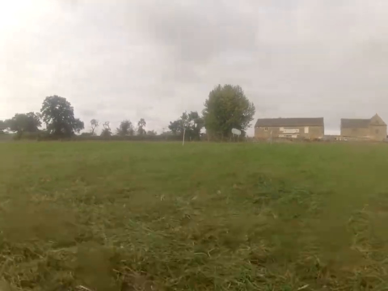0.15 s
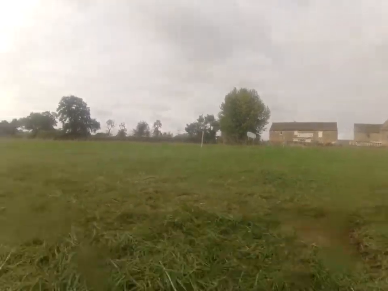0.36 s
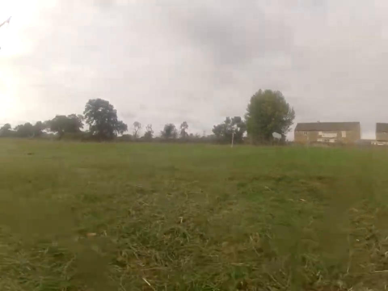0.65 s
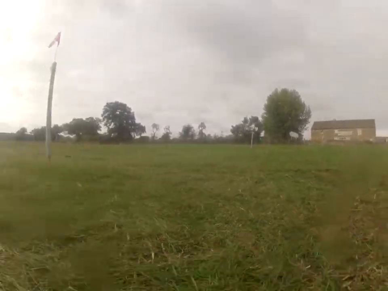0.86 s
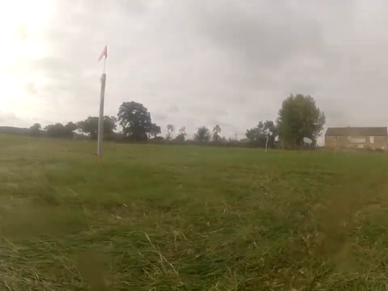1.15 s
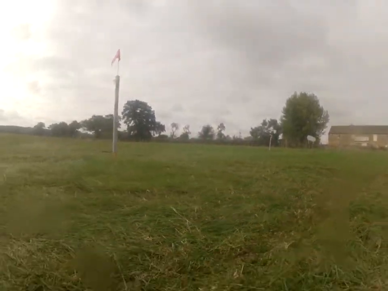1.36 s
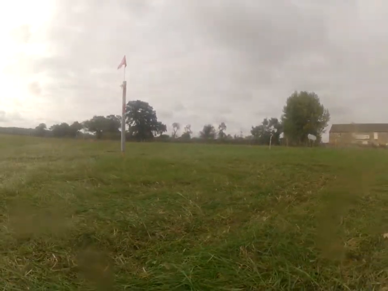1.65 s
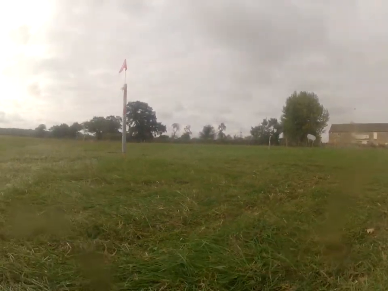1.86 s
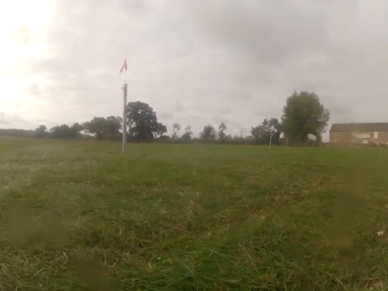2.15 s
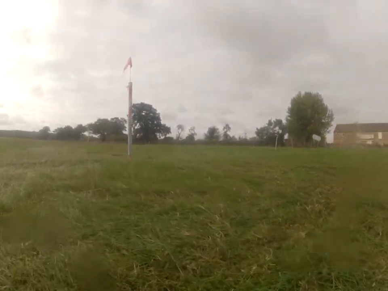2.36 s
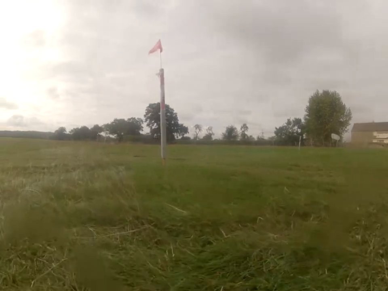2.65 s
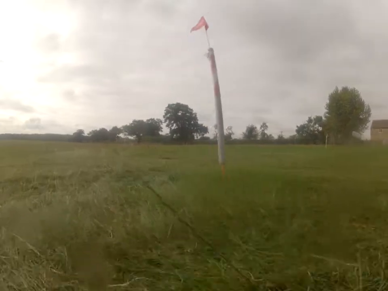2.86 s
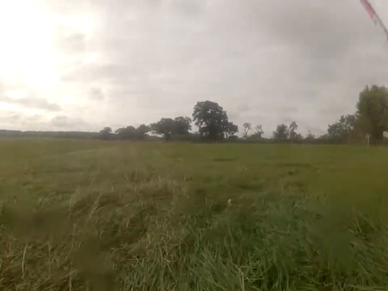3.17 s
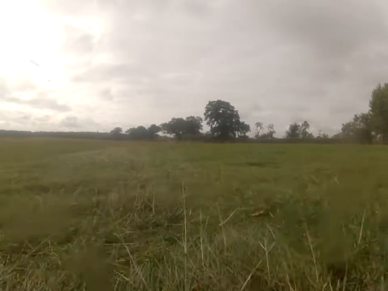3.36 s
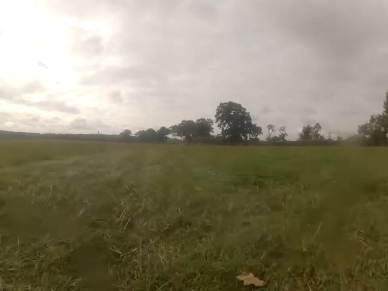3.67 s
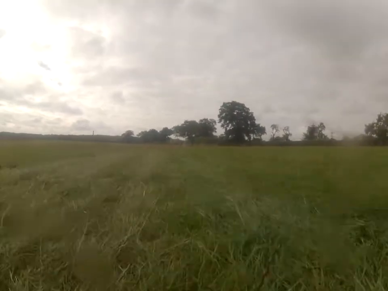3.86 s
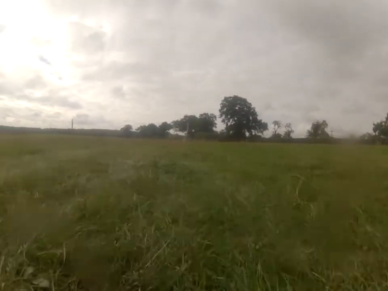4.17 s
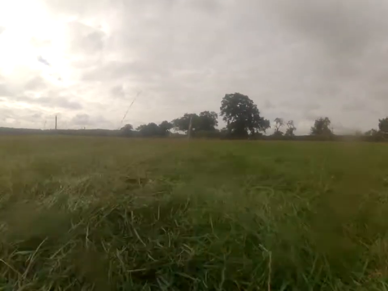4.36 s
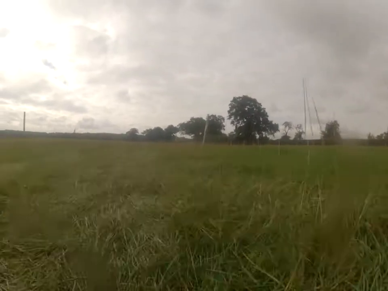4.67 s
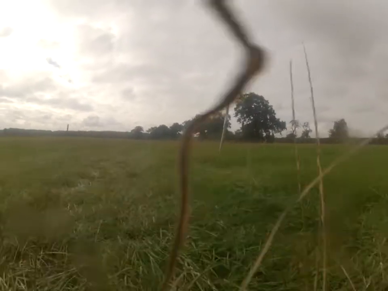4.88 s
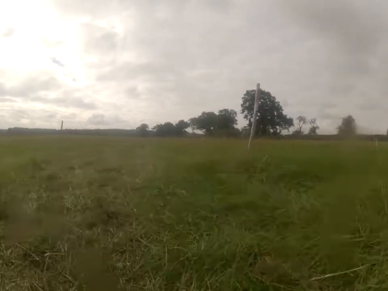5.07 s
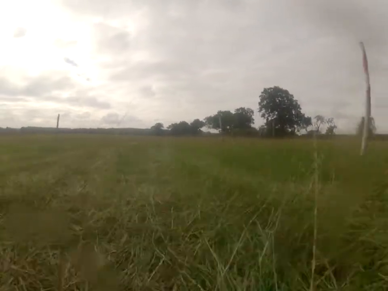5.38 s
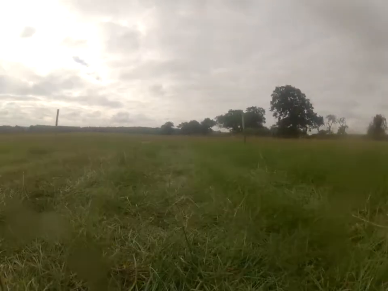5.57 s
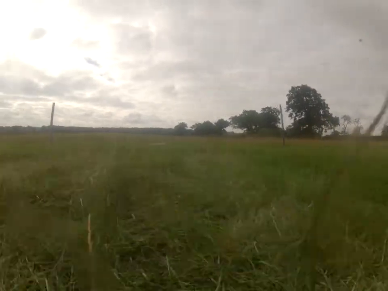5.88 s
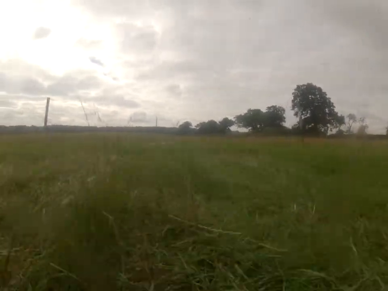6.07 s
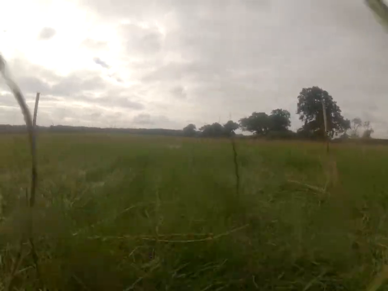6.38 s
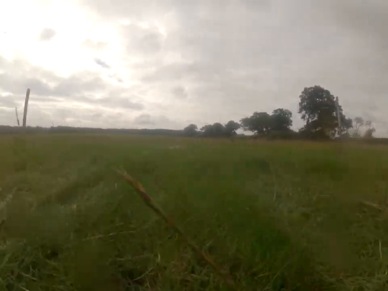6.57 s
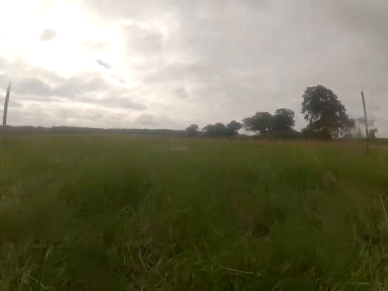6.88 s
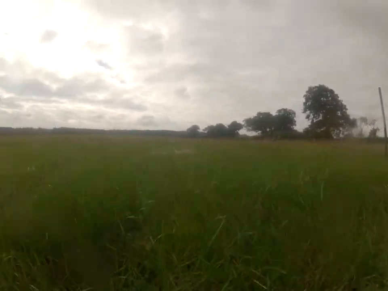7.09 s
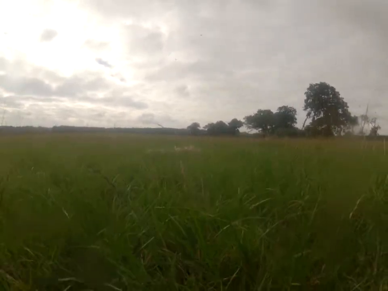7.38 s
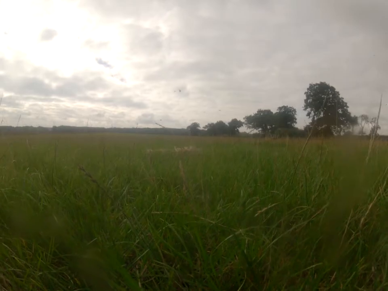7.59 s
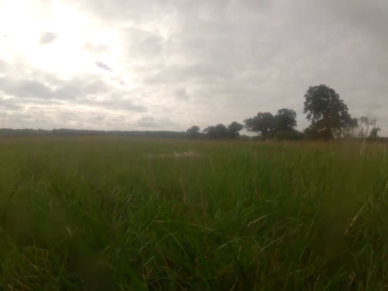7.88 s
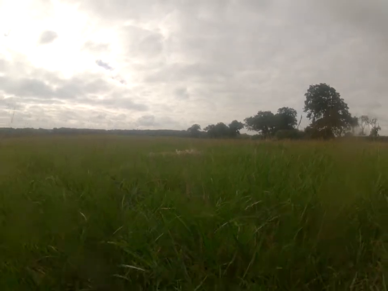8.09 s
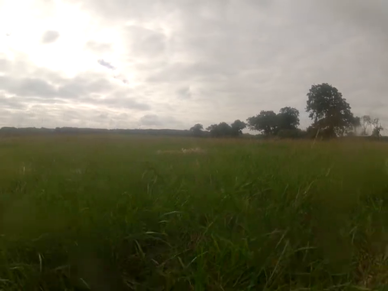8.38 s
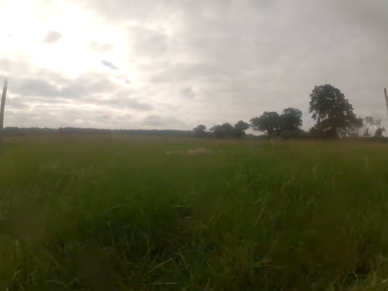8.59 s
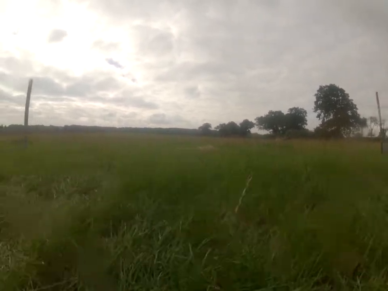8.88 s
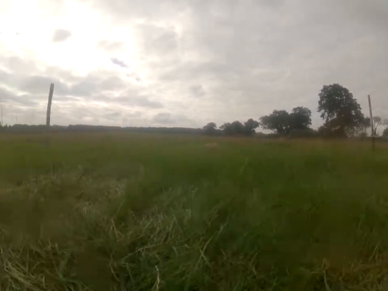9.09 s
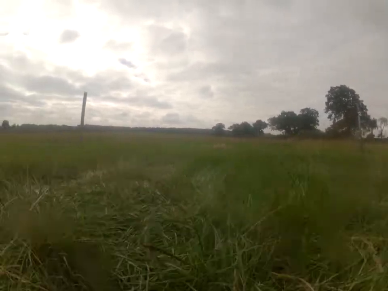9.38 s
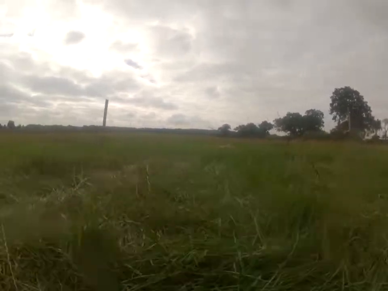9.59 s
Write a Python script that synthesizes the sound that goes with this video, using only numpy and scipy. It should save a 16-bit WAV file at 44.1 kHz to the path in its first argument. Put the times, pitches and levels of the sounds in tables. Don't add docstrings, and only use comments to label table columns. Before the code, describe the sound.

A car bounces over an open field, heard very close through a plastic housing. Boomy engine and ground rumble sit beneath airy hiss and pattering grass. After an early thud and hard acceleration come sharp, irregular hollow clacks and gritty stem scrapes, the background dipping briefly after loud hits. A calmer stretch exposes short rubbery squeaks and another thud before a last rev and clatter. Treble is harsh and grainy, bass thick.

```python
import sys
import numpy as np
from scipy import signal
from scipy.fft import rfft, irfft, next_fast_len
from scipy.io import wavfile
from scipy.ndimage import uniform_filter1d

SR = 44100
rng = np.random.default_rng(int(sys.argv[2]) if len(sys.argv) > 2 else 0)


def boost_factor(decibels):
    exponent = np.asarray(decibels, float) / 20
    return 10 ** exponent


def dump(signal):
    limited = np.clip(np.atleast_2d(signal).T, -1, 1)
    pcm = np.round(limited * 32767).astype(np.int16)
    wavfile.write(sys.argv[1], SR, pcm)


N = 429534


def level(x):
    return x / np.sqrt(np.mean(x ** 2))


def steady_level(x, window):
    return x / np.sqrt(uniform_filter1d(x ** 2, size=window))


def curves(table):
    s, *columns = np.transpose(table)
    return [np.interp(np.arange(N) / SR, s, column) for column in columns]


def swells(rows, edge):
    t = np.arange(0, N, 64) / SR
    change_db = sum(db * np.exp(-abs(2 * (t - s) / length) ** edge) for s, db, length in rows)
    return np.interp(np.arange(N) / SR, t, change_db)


def walk(rate, size=N):
    k = int(SR / rate)
    steps = np.repeat(rng.standard_normal(size // k + 1), k)
    return 1.82 * uniform_filter1d(uniform_filter1d(steps, k), k)[:size]


def add(track, s, sound):
    i = int(s * SR)
    track[i:i + len(sound)] += sound[:N - i]


def band(x, hz, width_hz):
    return signal.lfilter(*signal.iirpeak(hz, hz / width_hz, fs=SR), x)


def resonate(x, modes):
    return sum((-1) ** k * boost_factor(db) * band(x, hz, width) for k, (hz, width, db) in enumerate(modes))


def colour(x, points):
    hz, db = np.transpose(points)
    size = next_fast_len(N)
    bins = np.maximum(np.arange(size // 2 + 1) * SR / size, 1)
    gain = boost_factor(np.interp(np.log(bins), np.log(hz), db))
    return irfft(rfft(x, size) * gain, size)[:N]


CASE_TOP = signal.ellip(3, 1.5, 14, 4200, fs=SR, output="sos")


def muffle(x):
    return signal.sosfilt(CASE_TOP, 5.2 * x + 0.5 * band(x, 1200, 2500))


COAST_HZ, COAST_SAG_HZ_PER_S, COAST_DB, COAST_ENDS_S = 960, 290, -56, 0.64


def coast():
    t = np.arange(N) / SR
    turn = 2 * np.pi * (COAST_HZ * t - COAST_SAG_HZ_PER_S * t ** 2 / 2) + 0.68 * walk(30.5)
    fade = np.clip((COAST_ENDS_S - t) / 0.13, 0, 1)
    return boost_factor(COAST_DB + 3.7 * walk(15.6)) * fade * np.sin(turn)


# (multiple of the cycle rate, level over hiss [dB], rise time [s], fade time [s])
GEAR_WHINES = [(28, -15, 1.85, 3.1), (44, -18, 1.85, 2.7), (96, -15, 1.85, 3.05), (136, -24, 1.95, 2.5),
               (146, -24, 2.45, 2.75), (167, -19, 2.1, 2.5), (190, -21, 2.03, 2.5), (215, -21, 1.92, 2.12),
               (238, -21.5, 2.1, 2.56), (262, -19, 1.9, 2.17), (286, -21, 1.85, 2.1)]
# (frequency [Hz], width [Hz])
GEARBOX_WINDOWS = [(1500, 2600), (3100, 500), (3700, 400), (4150, 600), (5330, 400)]


def gear_whine(turns):
    size = N // 3
    t, turns, whine = np.arange(size) / SR, turns[:size], 0
    for k, db, start, end in GEAR_WHINES:
        gain = boost_factor(db + 1.4 * walk(18, size=size))
        fade = np.clip(np.minimum(end - t, t - start) / 0.1, 0, 1)
        whine = whine + gain * fade * np.sin(2 * np.pi * k * turns + 0.5 * walk(60, size=size))
    housed = sum(band(whine, *window) for window in GEARBOX_WINDOWS)
    return np.pad(housed, (0, N - size))


# (time [s], level [dB])
RUSH_LEVEL = [(0, -39), (0.68, -43), (1.31, -46.5), (1.72, -36), (2.1, -28), (2.84, -24), (3.11, -29.5),
              (4.2, -24.5), (4.55, -22.5), (5.18, -33.5), (5.8, -34), (6.5, -34), (6.9, -40.5), (7.22, -44),
              (7.9, -44.5), (8.32, -38), (9.31, -24), (9.74, -28)]
# (time [s], change [dB], length [s])
TUFT_SWEEPS = [
    (1.04, 5.5, 0.2),
    (4.87, 4, 0.21),
    (5.46, 5.5, 0.22),
    (5.99, 9.5, 0.12),
    (6.22, -1.5, 0.086),
    (6.68, 2.5, 0.11),
    (7.32, 15.5, 0.18),
    (7.6, -3, 0.066),
    (8.07, 7.5, 0.097),
]
# (frequency [Hz], density [dB per Hz])
HISS_COLOUR = [(150, 7.5), (250, -7), (575, -9.5), (657, -1.5), (790, -10), (989, 1), (1840, 0.5),
               (2050, -13.5), (2310, -2), (5310, -13), (5900, -29.5), (7670, -80), (13000, -120)]
# (frequency [Hz], width [Hz], level [dB])
CASE_MODES = [(636, 17, -23), (1020, 100, -2), (1250, 56, -8.5), (1840, 220, 0), (2260, 260, -6.5),
              (3600, 99, -27), (3790, 50, -20)]


def brush(turns, throttle, grass):
    hiss_db = curves(RUSH_LEVEL)[0] + swells(TUFT_SWEEPS, edge=4.7)
    puffs = 1 + 0.051 * throttle * np.cos(8 * np.pi * turns)
    gas = level(colour(rng.standard_normal(N), HISS_COLOUR)) * puffs * boost_factor(0.5 * walk(25))
    hits = rng.random(N) < 650 / SR
    blades = hits * boost_factor(2.0 * np.minimum(rng.exponential(size=N), 3.5) + 1.24 * walk(30))
    smear = uniform_filter1d(uniform_filter1d(blades, size=90), size=90)
    patter = level(muffle(colour(smear * rng.standard_normal(N), HISS_COLOUR)))
    mix = np.sqrt(1 - grass) * gas + np.sqrt(grass) * patter
    mix = level(0.32 * mix + resonate(mix, CASE_MODES))
    low = signal.sosfilt(signal.butter(2, [250, 750], "band", fs=SR, output="sos"), mix)
    return boost_factor(hiss_db) * (mix - low + boost_factor(-11 - 0.5 * grass) * level(low) + gear_whine(turns))


# (frequency [Hz], width [Hz], level [dB])
BODY_MODES = [(50, 14, 0), (75, 10, 3), (97, 14, -6), (140, 20, -3), (180, 40, -15), (250, 90, -22)]
# (multiple of the cycle rate, level [dB])
ENGINE_ORDERS = [(1, -40), (2, -31), (3, 13.5), (4, 4), (5, -10.5), (6, 2.5), (7, -17), (8, -7.5), (9, -2),
                 (10, -9), (11, -10), (12, -23), (13, -24), (14, -22)]


def orders(hz, turns):
    hz, turns, engine = hz[::8], turns[::8], 0
    for k, db in ENGINE_ORDERS + [(k, -14 - 0.2 * k) for k in range(15, 34)]:
        gain = 0.085 + sum(boost_factor(g) / np.hypot(1, 2 * (k * hz - f) / width) for f, width, g in BODY_MODES[1:])
        firing_db = (3 if k < 9 else 7) * (k % 4 == 0)
        wander_db = (0.8 + 0.02 * k) * walk(20, size=len(hz))
        gain = gain * boost_factor(0.5 * db + firing_db - 4 * (k > 21) + wander_db)
        engine = engine + gain * np.sin(2 * np.pi * (k * turns + rng.random()))
    return steady_level(signal.resample_poly(engine, 8, 1)[:N], SR // 6)


# (time [s], level [dB])
LOAD_LEVEL = [(0, -35.5), (0.93, -37.5), (1.3, -24), (1.44, -40), (1.6, -31.5), (1.95, -24), (2.45, -21),
              (2.82, -13.5), (3.07, -17), (3.15, -25.5), (3.95, -21), (5.06, -25.5), (6.2, -42.5),
              (7.2, -42.5), (7.8, -38), (8.6, -28), (9.1, -19), (9.74, -28.5)]
# (time [s], rumble level [dB])
BUMP_LEVEL = [(0, -34), (0.5, -28.5), (1.28, -37), (1.4, -48), (1.55, -24.5), (2.1, -38), (3.1, -40),
              (3.56, -22), (3.95, -24), (4.21, -17.5), (4.65, -19.5), (5.06, -16), (6.2, -31.5), (6.7, -50),
              (7.25, -41), (8.32, -22), (9.05, -51), (9.63, -29)]


def boom(hz, turns, throttle):
    boom_db, = curves(LOAD_LEVEL)
    bump_db, = curves(BUMP_LEVEL)
    ground = resonate(boost_factor(5.1 * walk(14)) * rng.standard_normal(N), BODY_MODES[1:])
    ground = steady_level(ground, SR // 5)
    deep = band(boost_factor(1 * walk(6.1)) * rng.standard_normal(N), BODY_MODES[0][0], 29.0)
    deep = steady_level(band(deep, 53.3, 42.5), SR // 4)
    pull = np.sqrt(throttle) * orders(hz, turns) + np.sqrt(1 - throttle) * ground
    return boost_factor(boom_db) * (pull + boost_factor(bump_db - boom_db) * deep)


# (time [s], change [dB], length [s], mode frequency [Hz])
BODY_SURGES = [
    (0.383, 9, 0.048, 70),
    (2.034, 11.5, 0.16, 75),
    (3.403, 8.5, 0.34, 80.4),
    (4.076, 3.5, 0.041, 89.5),
    (4.78, 4, 0.2, 75),
    (6.555, 10, 0.13, 70),
    (7.353, 22, 0.2, 135),
    (8.27, 3.5, 0.12, 64.4),
    (8.667, 7, 0.38, 65),
]


def surges(body):
    out = body
    for s, db, length, hz in BODY_SURGES:
        lift = boost_factor(swells([(s, db, length)], edge=3.8)) - 1
        out = out + lift * band(body, hz, 0.44 * hz)
    return out


# (time [s], level [dB], length [s], top frequency [Hz])
STEM_SCRAPES = [(4.489, -25, 0.086, 4220), (4.572, -15, 0.017, 4100), (4.738, -20.5, 0.014, 4040),
                (4.805, -22.5, 0.018, 4080), (4.832, -23, 0.016, 4040), (4.87, -38, .016, 4150),
                (4.896, -19, 0.033, 4270), (4.944, -22, 0.028, 4200), (5.352, -27, .012, 4150),
                (5.39, -21, 0.021, 4130), (5.424, -34, 0.0092, 4080), (5.445, -20.5, 0.017, 4200),
                (5.472, -30, 0.014, 4050), (5.512, -20, 0.053, 4220), (5.56, -14.5, .009, 4200),
                (5.574, -22, 0.011, 4250), (6.333, -35.5, 0.021, 4170), (9.28, -41, 0.014, 4080),
                (1, -49, 0.02, 4100), (1.041, -38, 0.022, 4100), (5.646, -31.5, 0.014, 4100),
                (5.977, -20.5, 0.04, 4120), (7.322, -30.5, 0.13, 5500)]
SCRAPE_GRAINS_PER_S = 1500


def scrapes():
    out = np.zeros(N)
    t = np.arange(SR // 3) / SR - 1 / 6
    for s, db, length, top_hz in STEM_SCRAPES:
        slips = rng.random(len(t)) < SCRAPE_GRAINS_PER_S / SR
        grains = slips * boost_factor(5 * np.minimum(rng.exponential(size=len(t)), 2.5))
        noise = uniform_filter1d(grains + 0.006, size=28) * rng.standard_normal(len(t))
        body = 0.5 * band(noise, 1480, 2700) + 0.13 * band(noise, 3670, 410) + resonate(noise, CASE_MODES)
        body = signal.sosfilt(signal.ellip(5, 1, 15, min(top_hz, 5900), fs=SR, output="sos"), body)
        add(out, s - 1 / 6, boost_factor(db) * np.exp(-abs(2 * t / length) ** 4) * level(body))
    return out


# (time [s], peak level [dB], pitch [Hz], length [s])
BUSHING_SQUEAKS = [(1.3217, -23, 1509, 0.018), (5.119, -21.5, 1545, 0.013), (5.681, -24.5, 1570, 0.019),
                   (7.142, -23, 1548, 0.043), (7.245, -28, 1530, 0.05), (7.351, -22.5, 1540, 0.029),
                   (7.471, -35.5, 1570, 0.013), (7.988, -19.5, 1520, 0.022), (8.113, -19.5, 1517, 0.028),
                   (8.232, -23, 1540, 0.016), (8.285, -33, 1514, 0.027), (8.335, -31.5, 1540, 0.032),
                   (8.76, -19, 1543, 0.043)]


def squeaks():
    out = np.zeros(N)
    for s, db, hz, length in BUSHING_SQUEAKS:
        t = np.arange(int((2 * length + 0.01) * SR)) / SR
        first_slip = np.sin(np.pi * np.clip(t / length, 0, 1) ** 1.2) ** 0.56
        swell = first_slip + 0.36 * np.exp(-((t - 1.25 * length) / 0.0087) ** 2)
        jitter = 0.033 * np.cumsum(rng.standard_normal(len(t)))
        turn = 2 * np.pi * hz * (t + 0.24 * t ** 2) + jitter
        octave = boost_factor(2 * db + 21 - 0.35 * (hz - 1535)) * swell * np.sin(2 * turn)
        add(out, s - 0.005, boost_factor(db) * swell * (np.sin(turn) + octave))
    return out


# (time [s], peak level [dB], deep mode share [dB], ring [s], rattle level [dB])
RUT_THUDS = [
    (0.965, -9, 1.5, 0.42, -23),
    (1.196, -25, -17, 0.1, -13),
    (7.558, -10.5, -13.5, 0.27, -16.5),
    (4.503, -26.5, -2, 0.087, 10.5),
    (7.577, -27, -13, 0.13, 2),
    (7.772, -39, -4, 0.059, 3.5),
]
# (frequency [Hz], level [dB], change when the deep mode stays quiet [dB])
UPPER_MODES = [(75, -4.5, -4.5), (98.1, -4.5, -6), (136, -11, 8.5), (163.7, -16, 7.5), (205, -16, 2.5),
               (246.4, -24, 4), (334, -40, 5), (470, -38.5, 6), (637, -41, 14)]


def thuds():
    out, t = np.zeros(N), np.arange(SR // 2) / SR
    for s, db, deep_db, t60, rattle_db in RUT_THUDS:
        fade = np.minimum(t / 0.0043, 1) * np.exp(-(t / (0.34 * t60)) ** 2)
        deep = -boost_factor(deep_db) * np.sin(2 * np.pi * 44 * t) * np.minimum(t / 0.0095, 1)
        upper = 0
        for hz, g, change_db in UPPER_MODES:
            mode_db = g - deep_db / 2 + change_db * (deep_db < 0)
            mode_db = mode_db + 1.7 * walk(hz / 4, size=len(t)) - 0.2 * min(hz, 200) * t
            build = np.minimum(t * hz / 0.84, 1) ** 2
            upper = upper + boost_factor(mode_db) * build * np.sin(2 * np.pi * hz * t)
        noise = rng.standard_normal(len(t))
        rattle = level(band(noise, 310, 910) + 0.027 * resonate(noise, CASE_MODES[:5]))
        burst = boost_factor(rattle_db) * np.exp(-t / 0.071) * rattle
        burst = signal.sosfilt(signal.butter(4, 2600, fs=SR, output="sos"), burst)
        add(out, s, boost_factor(db) * fade * (deep + upper + burst))
    return out


# (time [s], peak level [dB], ring frequency [Hz])
STALK_KNOCKS = [(1.024, -9, 2260), (4.247, -18, 2260), (4.315, -12, 1304), (4.34, -1.5, 1760),
                (4.483, -8.5, 1870), (4.496, -6, 1890), (4.796, -9, 970), (4.878, -11, 1750),
                (5.236, -20.5, 1190), (5.285, -19.5, 1064), (5.345, -19, 2280), (5.442, -27, 1850),
                (5.495, -1.5, 1780), (5.57, -0.5, 2080), (6.158, -6.5, 1720), (6.409, -13.5, 2220),
                (6.543, -2.5, 1820), (6.592, -8, 2320), (6.664, -13.5, 1730), (6.722, -19, 1020),
                (7.56, -25.5, 2260), (8.115, -20, 1490), (9.046, -16.5, 1850), (9.171, -14, 1060),
                (9.278, -28, 1310), (9.301, -6, 1780), (9.325, -10.5, 1030)]
# (time [s], peak level [dB], ring frequency [Hz], shove over peak [dB])
STEM_SLAPS = [(0.982, -13.5, 2260, -27), (1.068, -14, 2230, -7), (4.173, -12, 1120, 0.5),
              (4.428, -10.5, 2280, -10), (4.461, -15.5, 1020, 3), (4.516, -7.5, 1030, 8),
              (4.559, -12, 2270, 0), (4.593, 2, 1720, -2.5), (4.721, -6, 1210, -9), (4.96, -9.5, 2370, -5),
              (5.157, -22.5, 1100, 0), (5.189, -16, 1270, -17), (5.369, -2, 1840, -14),
              (5.565, -6, 1790, -10), (5.626, -20.5, 1020, -3), (5.651, -13, 1690, -0.5),
              (5.911, 1.5, 2120, -15.5), (6.429, -2.5, 2060, -5.5), (8.747, -11, 1700, -5.5),
              (9.343, -16.5, 1220, 7), (9.381, -3, 1690, -22), (9.499, -13.5, 1070, -11),
              (9.703, -10.5, 1020, -16), (9.725, -7, 1840, -8)]
# (time [s], peak level [dB], ring frequency [Hz], tick over peak [dB])
TIP_FLICKS = [(1.177, -24.5, 1730, -20), (2.985, -7, 1800, -7), (3.993, -2, 1710, -7.5),
              (4.772, -26, 1840, 4), (4.853, -11, 1250, -2), (5.369, -15.5, 1450, 5),
              (5.893, -31, 1040, -3), (5.959, -23, 1020, -7), (6.09, -12.5, 1820, -8.5),
              (6.138, -14, 1830, -9.5), (6.265, -11, 2570, -36), (6.43, -1, 2260, -10.5),
              (6.469, -24, 1060, -5), (7.149, -11, 1930, 1)]
# (time [s], peak level [dB], ring frequency [Hz])
LIGHT_TAPS = [(0.99, -16, 1050), (1.017, -12, 1470), (1.045, -28, 1100), (1.081, -19.5, 1100),
              (1.188, -19, 1800), (4.906, -11, 1800), (4.92, -4.5, 2180), (5.378, -12, 2250),
              (5.393, -15, 1250), (5.709, -20, 980), (5.727, -20, 2250), (5.742, -27, 2310),
              (5.757, -18, 2260), (5.835, -22, 1020), (5.986, -32, 2250), (5.995, -26, 2250),
              (6.029, -25, 1060), (6.375, -18, 1760), (6.39, -16, 2250), (6.486, -16, 1830),
              (6.494, -16.5, 1860), (6.632, -23, 1880), (6.686, -17.5, 2430), (6.7, -18, 2270),
              (6.747, -20, 1880), (7.851, -24.5, 1100), (8.57, -20, 1800), (9.515, -13, 1080),
              (3.603, -21, 1870), (3.637, -24, 2170), (3.817, -17, 1820), (4.378, -17, 1130),
              (4.45, -15, 1040), (4.699, -25, 1050), (4.783, -14, 2200), (4.81, -12, 1140),
              (4.821, -14, 1250), (4.856, -12, 1620), (4.912, -2, 1700), (4.94, -23, 2150),
              (4.972, -12, 1790), (5.026, -16.5, 1080), (5.063, -33, 2200), (5.36, -15, 1500),
              (5.451, -21, 1600), (5.457, -14, 1800), (5.471, -18, 2230), (5.488, -21, 1800),
              (5.52, -18, 1800), (5.531, -20, 1800), (5.794, -33, 1090), (6.356, -25, 1960),
              (6.777, -28, 1840), (7.195, -31, 2300), (7.325, -13.5, 1880), (9.198, -22, 1800),
              (9.389, -21, 1250), (9.437, -17, 1200), (9.675, -17, 1270), (9.73, -7, 2160)]
SHOVE_DB, TICK_DB, TAP_TICK_DB = -16.5, -40, -47
LEAD_S, LEAD_SHARE = 0.007, 0.09
STRIKE, STRIKE_S = 2.06, 0.00006
SNAP_DB, SNAP_GROWS = -17.5, 0.58
DUCK_FROM_DB, DUCK_SLOPE = -3, 4.75


def knocks():
    out, dip = np.zeros(N), np.zeros(N)
    lead = np.arange(1600) / SR - LEAD_S
    t = np.maximum(lead, 0)
    after = np.arange(SR // 2) / SR
    rows = [(*r, SHOVE_DB, TICK_DB) for r in STALK_KNOCKS]
    rows += [(*r, TICK_DB) for r in STEM_SLAPS]
    rows += [(*r[:3], SHOVE_DB, r[3]) for r in TIP_FLICKS]
    rows += [(*r, SHOVE_DB, TAP_TICK_DB) for r in LIGHT_TAPS]
    for s, db, hz, shove_db, tick_db in rows:
        noise = rng.standard_normal(len(t))
        rattle = np.exp(-(t / 0.0046) ** 3.1) + 0.49 * np.exp(-t / 0.0021)
        crack = noise * np.minimum(t / 0.00072, 1) * rattle
        crack = crack + STRIKE * np.exp(-(lead / STRIKE_S) ** 2)
        crack = crack + LEAD_SHARE * noise * (lead < 0) * (1 + lead / LEAD_S)
        ring = band(crack, hz, hz / 4) * 4.4 + resonate(crack, CASE_MODES) + 0.5 * band(crack, 1900, 2000)
        shove = band(band(crack, 324, 800), 283, 1350)
        tick = band(band(crack, 3800, 600), 3800, 1200)
        edge, snap = band(crack, 3280, 900), band(crack, 4560, 1500)
        parts = [(muffle(ring), 0), (shove, shove_db), (tick, tick_db), (edge, -16),
                 (snap, SNAP_DB + SNAP_GROWS * db)]
        add(out, s - LEAD_S, sum(boost_factor(db + g) * part / abs(part).max() for part, g in parts))
        depth_db = DUCK_SLOPE * max(db + max(shove_db, 0) - DUCK_FROM_DB, 0)
        add(dip, s + 0.0099, depth_db * np.minimum(after / 0.0038, 1) * np.exp(-after / 0.055))
    return out, dip


# (time [s], engine cycle rate [Hz])
ENGINE_REVS = [(0, 12.6), (1.64, 12.8), (1.85, 14.8), (2.15, 21.7), (2.25, 22.65), (2.45, 22.5),
               (2.87, 25.1), (3.03, 24), (3.28, 18.8), (3.5, 19.4), (4.0, 23.9), (4.3, 19.3), (5, 16.6),
               (8.45, 12.5), (8.99, 21.7), (9.2, 23), (9.4, 22.9), (9.74, 17)]
# (time [s], throttle [0-1], depth of the grass [0-1])
PEDAL_AND_GRASS = [(0, 0.56, 0.32), (1.6, 0.7, 0.3), (1.9, 0.7, 0.03), (2.5, 0.99, 0.36), (3.1, 1, 0.04),
                   (3.3, 0.63, 0.61), (4.1, 1, 0), (4.35, 0.22, 0.96), (6.75, 0.4, 0.87), (6.9, 0.26, 0.8),
                   (7.22, 0.05, 0.07), (7.45, 0.18, 0.14), (8.3, 0, 0.47), (8.55, 0.63, 0.07),
                   (9.2, 0.87, 0.4), (9.45, 0.3, 0.82), (9.6, 1, 0.5)]


def scene():
    hz, = curves(ENGINE_REVS)
    throttle, grass = np.clip(curves(PEDAL_AND_GRASS), 0.02, 0.98)
    turns = np.cumsum(hz) / SR
    cracks, dip_db = knocks()
    body = surges(boom(hz, turns, throttle))
    steady = body + brush(turns, throttle, grass) + scrapes() + coast()
    return (steady * boost_factor(-dip_db) + cracks + squeaks() + thuds())[None]


def top_cut(x):
    return signal.sosfilt(signal.butter(12, 16500, fs=SR, output="sos"), x)


def record(dry):
    dry = dry - 0.39 * band(dry, 4500, 560)
    dry = dry - 0.8 * band(dry, 6600, 470)
    limited = 0.62 * np.tanh(dry / 0.62)
    slow = signal.resample_poly(limited, 40, 147, axis=1)
    held = signal.resample_poly(np.repeat(slow, 4, axis=1), 147, 160, axis=1)[:, :N]
    held = signal.sosfilt(signal.butter(12, 15450, fs=SR, output="sos"), held)
    return top_cut(held)


dry = scene()
out = record(dry)
dump(out)
```